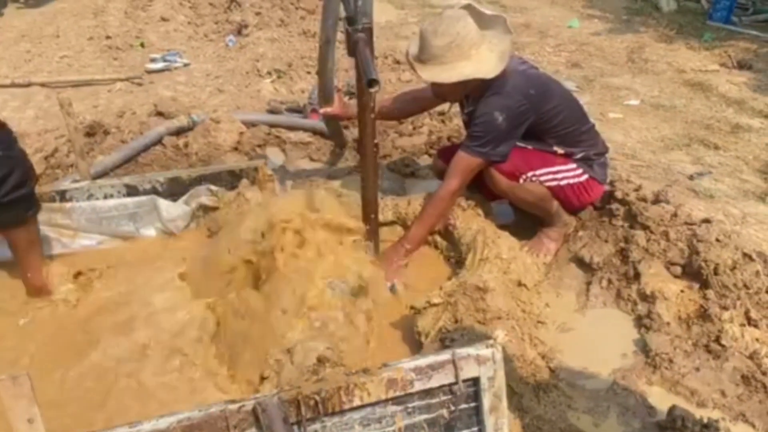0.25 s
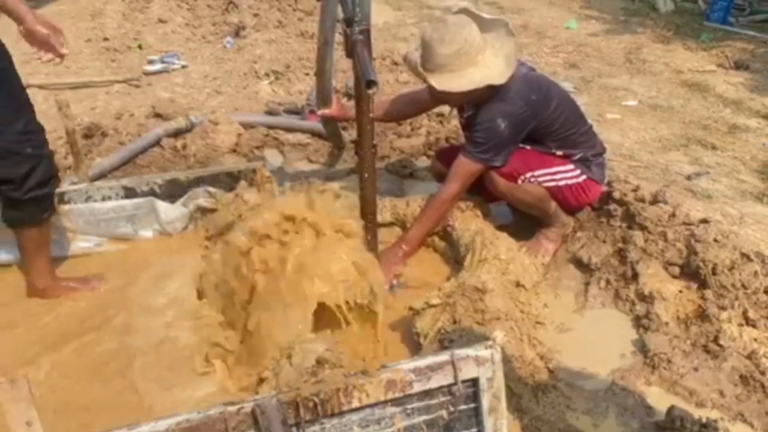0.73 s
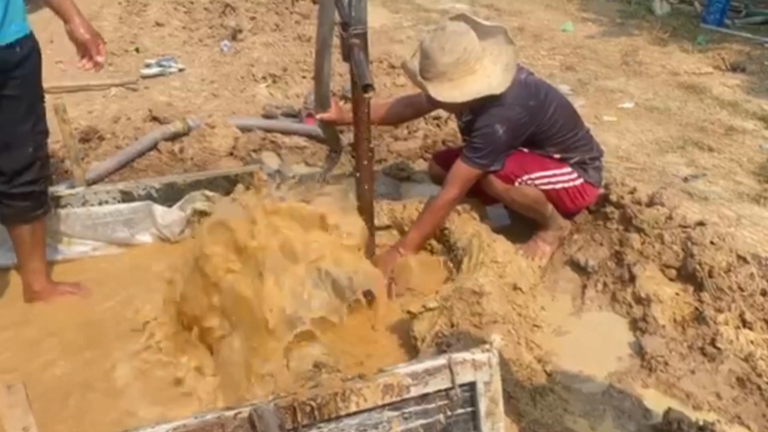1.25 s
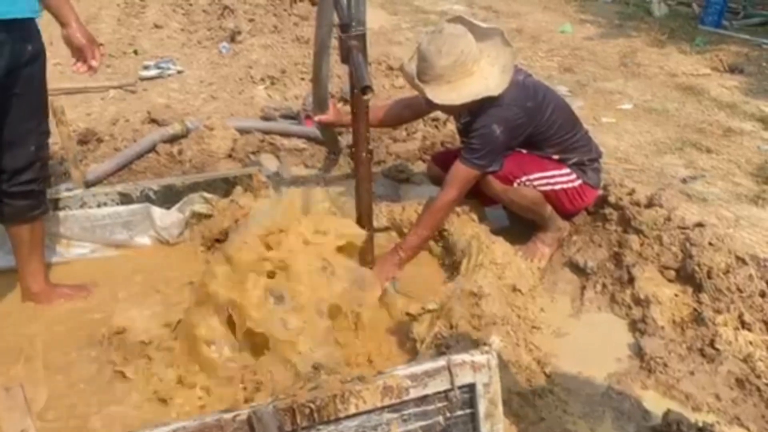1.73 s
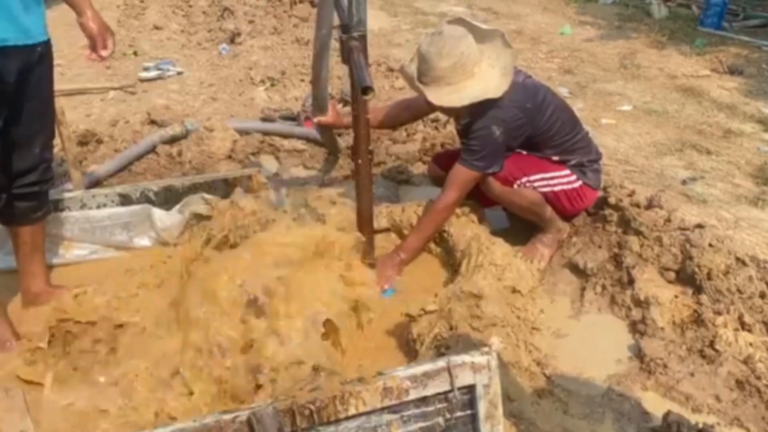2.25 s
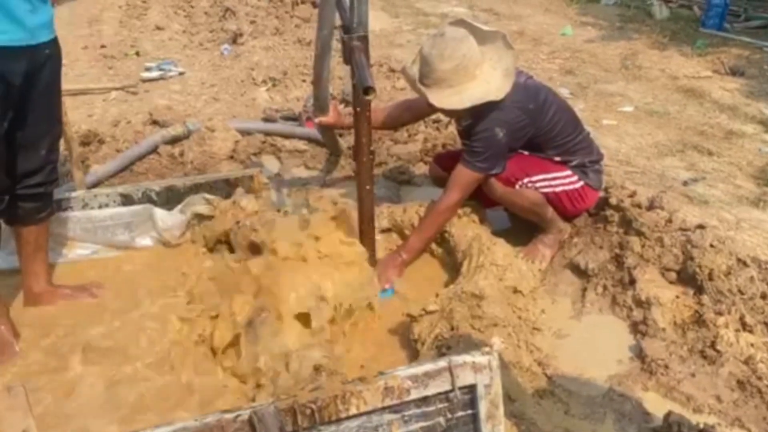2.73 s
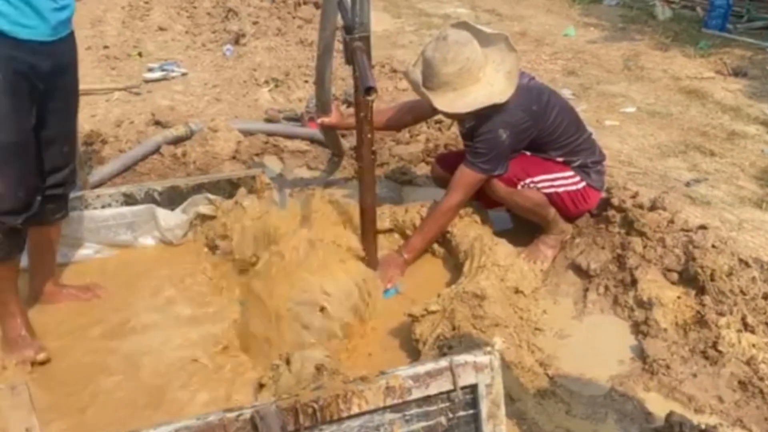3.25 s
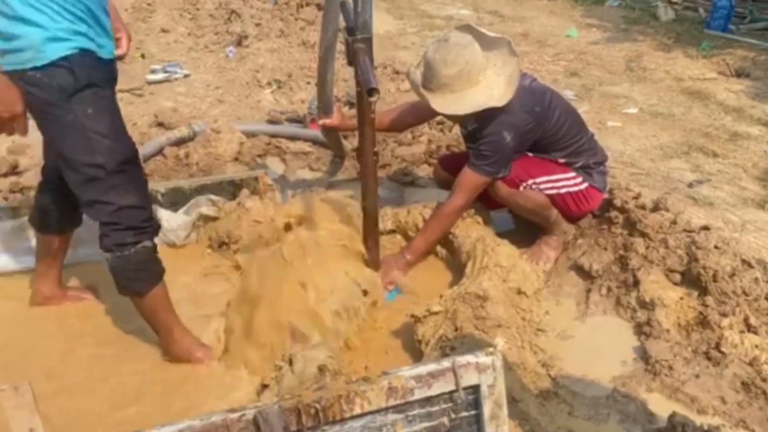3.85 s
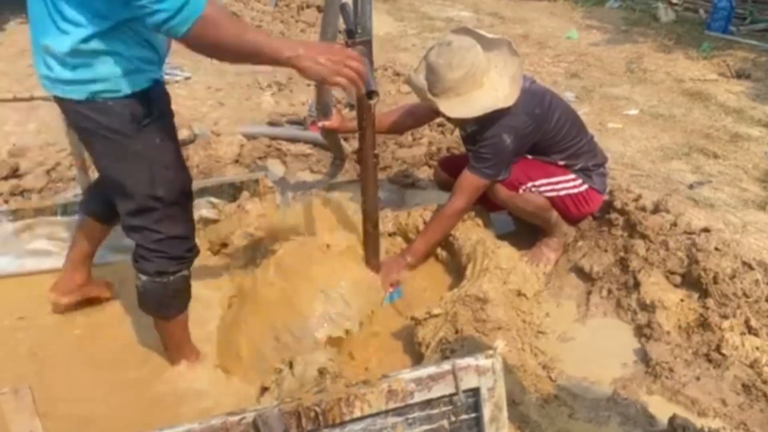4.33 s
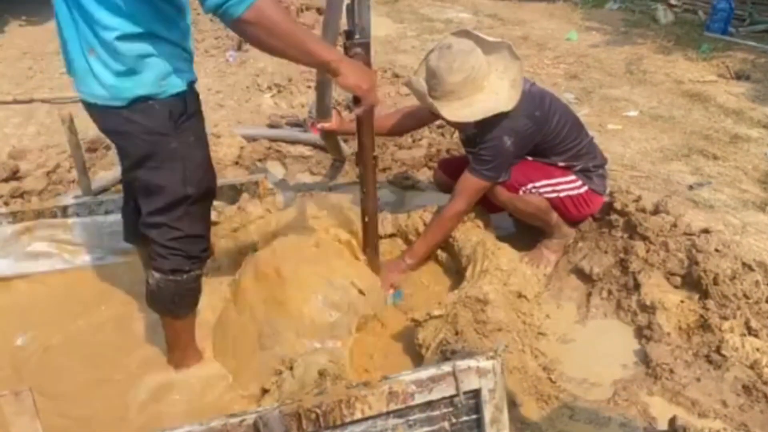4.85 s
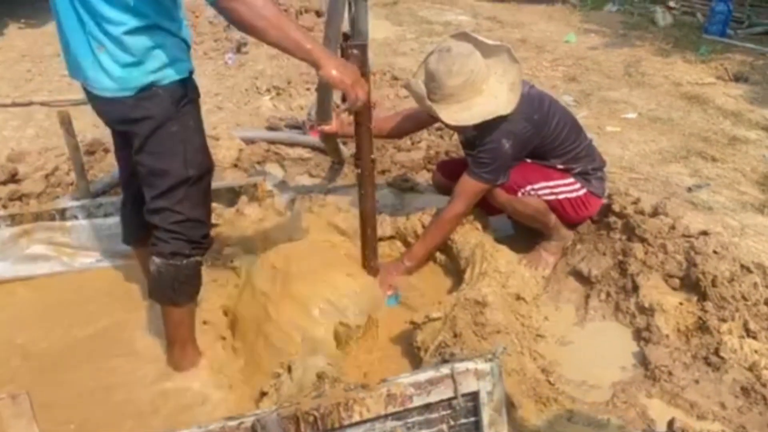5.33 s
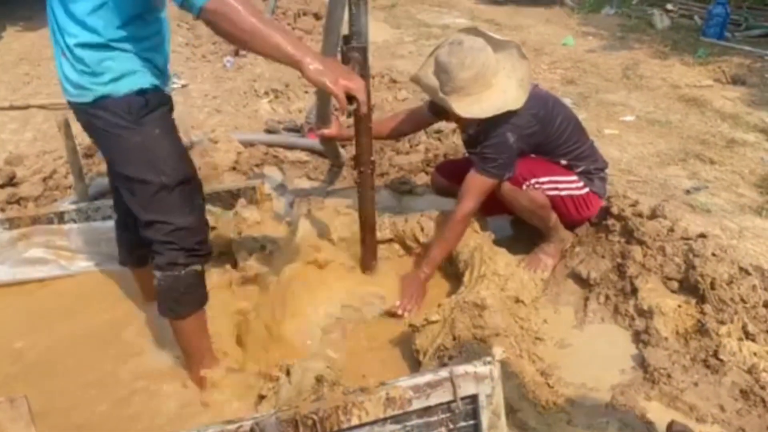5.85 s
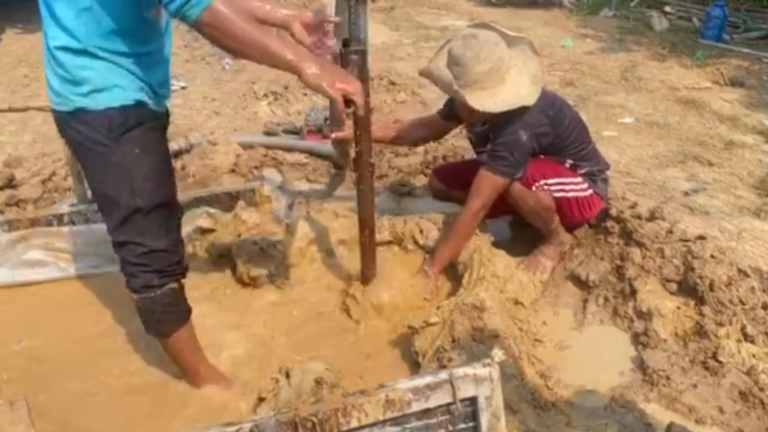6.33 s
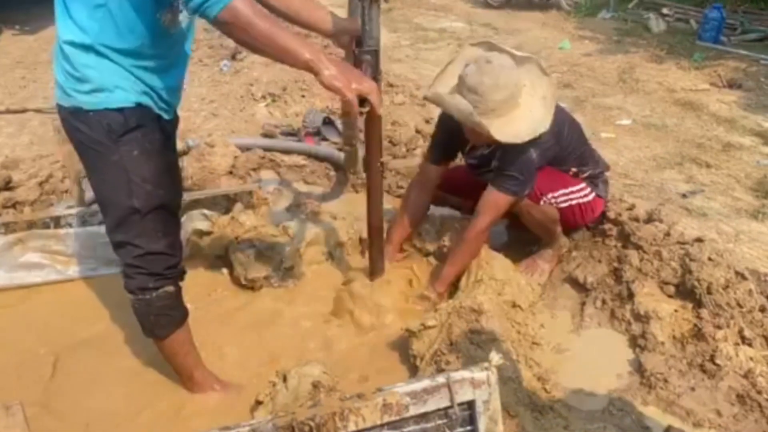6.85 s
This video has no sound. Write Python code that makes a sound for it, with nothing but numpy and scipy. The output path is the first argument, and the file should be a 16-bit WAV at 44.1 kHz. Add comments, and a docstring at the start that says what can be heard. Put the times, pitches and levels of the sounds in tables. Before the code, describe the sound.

Rapid clattering thump of a small diesel pump engine with muddy water rushing; midway its knock fades briefly, then returns slower and lighter.

```python
"""Outdoors, some metres from a phone: a single-cylinder four-stroke diesel drives a mud pump.
Each cycle, gas pulses ring the intake and silencer, and noise bursts ring the block, head, crankcase and valves.
Jolts ring the frame; shaft tones follow the crank; the mud is flickering noise with grains; loose metal clinks.
The throttle is shut after 4.2 s: the engine coasts with little knock for about half a second,
then idles slower, and the mud gushes less."""
import sys
import numpy as np
from scipy import signal
from scipy.fft import rfft, irfft
from scipy.io import wavfile
from scipy.ndimage import uniform_filter1d

SR = 44100
rng = np.random.default_rng(int(sys.argv[2]) if len(sys.argv) > 2 else 0)


def to_wav(s):
    """Save 16-bit WAV."""
    ch = np.atleast_2d(s).T  # columns
    pcm = np.round(np.clip(ch, -1, 1) * 32767)  # PCM
    wavfile.write(sys.argv[1], SR, pcm.astype(np.int16))


N = 312660


def undb(db):
    """Gain of a dB value."""
    return 10 ** (np.asarray(db) / 20)


def unit(x):
    """Scaled to rms 1."""
    return x / np.sqrt(np.mean(x ** 2))


def by_state(state, values):
    """Value interpolated over the engine states 0 pulling, 1 coasting, 2 idling."""
    return np.interp(state, range(3), values)


def ring(x, modes):
    """Sum of two-pole resonances (Hz, width Hz, dB, polarity if given)."""
    out = 0
    for hz, width_hz, db, *sign in modes:
        b, a = signal.iirpeak(hz, hz / width_hz, SR)
        out = out + np.prod(sign) * undb(db) * signal.lfilter(b, a, x)
    return out


def colour(x, points):
    """Spectrum shaped to (Hz, dB) points, straight lines over log frequency."""
    hz, db = np.transpose(points)
    grid_hz = np.maximum(np.arange(N // 2 + 1) * SR / N, 1)
    gain_db = np.interp(np.log(grid_hz), np.log(hz), db)
    return irfft(rfft(x) * undb(gain_db), N)


def walk(rate_hz):
    """Random levels held 1 / rate_hz s, slewed twice, scaled to rms 1."""
    k = int(SR / rate_hz)
    steps = np.repeat(rng.standard_normal(N // k + 1), k)
    slewed = uniform_filter1d(uniform_filter1d(steps, k), k)
    return unit(slewed[:N])


def train(cycle, place, strength, scatter_db, jitter_s):
    """One impulse a cycle at the given place, each a little early or late, weak or strong."""
    at = np.flatnonzero(np.diff(np.floor(cycle - place)) > 0)
    chance = rng.standard_normal((len(at), 2))
    shift = (jitter_s * SR * chance[:, 0]).astype(int)
    moved = np.clip(at + shift, 0, N - 1)
    out = np.zeros(N)
    out[moved] = (strength * np.ones(N))[at] * undb(scatter_db * chance[:, 1])
    return out


def bursts(cycle, table, scatter_db, repeat, jitter_s=0.0003, state=0):
    """Noise with sharp onsets and exponential decays; the share `repeat` of its power is the same every cycle."""
    envelope = 0
    for place, decay_s, *db in table:
        strength = undb(np.interp(state, range(len(db)), db))
        hits = train(cycle, place, strength, scatter_db, jitter_s)
        envelope = envelope + signal.lfilter([1], [1, -np.exp(-1 / (decay_s * SR))], hits)
    turn = np.floor(cycle - table[0][0])
    since = np.arange(N) - np.searchsorted(turn, turn)  # samples since the first row's place
    habit, fresh = rng.standard_normal((2, N))
    return envelope * (np.sqrt(repeat) * habit[since] + np.sqrt(1 - repeat) * fresh)


def pulses(cycle, state, table, scatter_db):
    """A train of short Gaussian pushes for each row; place and strength follow the state."""
    sigma_s = .00015
    push = np.exp(-.5 * (np.arange(-30, 31) / (sigma_s * SR)) ** 2)
    out = []
    for row in table:
        place, strength = by_state(state, row[:3]), by_state(state, row[3:])
        hits = train(cycle, place, strength, scatter_db, jitter_s=.00004)
        out.append(np.convolve(hits, push / push.sum(), "same"))
    return out


def clinks():
    """Loose metal on the rig: short dull rings, two decaying partials each."""
    # Each row: start in seconds, level of each partial in dB, lower partial in Hz.
    clink_rows = [(3.0256, -22, 1550), (3.3627, -19, 1550), (3.75, -22.5, 1570), (3.9756, -25, 1545)]
    decay_s = 0.0098
    out, t = np.zeros(N), np.arange(3000) / SR
    for start_s, db, hz in clink_rows:
        k = int(start_s * SR)
        partials = np.sin(2 * np.pi * hz * t) + np.sin(2 * np.pi * 1.07 * hz * t)
        out[k:k + len(t)] += undb(db) * np.exp(-t / decay_s) * partials
    return out


def mud(state):
    """Slurry gushing and slopping: flickering hiss with dense soft grains; level and middle thin with the pump."""
    # Slurry spectrum. Each row: frequency in Hz, relative density in dB per Hz.
    slurry_spectrum = [(18, -44), (30, -19.5), (71, -17.5), (168, -15.5), (213, -11), (277, -11.5),
                       (554, -19), (703, -22.5), (810, -26), (950, -24), (1140, -32.5), (1440, -30),
                       (1830, -26), (2950, -29), (3750, -29), (6650, -34.5), (9070, -50), (11800, -105.5),
                       (20000, -120)]
    # The mud's hollow middle: centre in Hz, width in Hz.
    gurgle = (555, 200)
    # Share of that middle gone: pulling, coasting, idling (0-1).
    drained = (0, .4, .55)
    # Level in dB: pulling, coasting, idling.
    level_db = (-25, -27.5, -28.5)
    grains_per_s, grains_db, flicker_db = 1500, -6.0, 0.83
    grains = (rng.random(N) < grains_per_s / SR) * rng.standard_normal(N)
    flicker = undb(flicker_db * walk(6.7))
    rough = rng.standard_normal(N) + undb(grains_db) * unit(grains)
    slurry = unit(colour(flicker * rough, slurry_spectrum))
    middle = ring(slurry, [(*gurgle, 0)])
    return undb(by_state(state, level_db)) * (slurry - by_state(state, drained) * middle)


def rotation(cycle, state):
    """Sines tied to the shaft: the unbalanced crank shakes the skid, gear tones waver in level."""
    # Each row: multiple of crank speed, place of the crest in the turn (0-1), dB pulling, coasting, idling.
    skid_shake = [(1, .22, -37, -45, -49), (3, .053, -26, -50, -45), (4, .96, -36, -45, -33)]
    # Pump gear behind the belt, then hums that need load.
    # Each row: times a cycle, dB pulling, coasting, idling.
    gear_tones = [(47.56, -41, -39, -37.5), (37, -41.5, -60, -60), (39, -41.5, -60, -60),
                  (43, -41.5, -60, -60), (51, -44, -60, -60), (56, -45, -60, -60), (74, -38.5, -60, -56)]
    waver_db = 1.6
    out = np.zeros(N)
    for k, place, *db in skid_shake:
        out += undb(by_state(state, db)) * np.cos(2 * np.pi * k * (cycle * 2 - place))
    for k, *db in gear_tones:
        level_db = by_state(state, db) + waver_db * walk(5.4)
        out += undb(level_db) * np.sin(2 * np.pi * k * cycle)
    return out


def frame(cycle, state):
    """Rod and valve gear jolt the steel frame, which hums at its resonances."""
    # Each row: place in the cycle (0-1) pulling, coasting, idling, then relative signed strength for each.
    jolts = [(0.0407, 0.0432, 0.008, 28, -14, 6), (0.0924, 0.0537, 0.1045, 39, -5, 1),
             (0.2594, 0.3181, 0.3137, 5, -7, 11), (0.4519, 0.4302, 0.4596, -27, 8, -26),
             (0.541, 0.5505, 0.5366, 74, -2, 43), (0.7189, 0.7189, 0.6374, -2, 17, 17),
             (0.7827, 0.7903, 0.7942, 26, 28, -2), (0.9269, 0.9917, 0.9586, -19, 8, -3)]
    # Frame resonances. Each row: frequency in Hz, width in Hz, relative level in dB, polarity.
    frame_modes = [(403.9, 44.2, -10.1, 1), (439.3, 16.8, -8.3, -1), (488.6, 19.3, -21.9, 1),
                   (653.8, 12.0, -23.0, 1), (717.4, 33.3, -23.8, -1), (852.1, 31.3, -18, -1),
                   (1321.9, 60, -24, -1), (1483.1, 36.8, -19.8, -1)]
    return ring(sum(pulses(cycle, state, jolts, scatter_db=0.5)), frame_modes)


def crankcase(cycle, state):
    """Rod play raps the crankcase, which hums nearly alike every cycle."""
    # Each row: place in the cycle (0-1), decay in seconds, relative level in dB.
    rod_raps = [(.475, 0.0089, -6.5), (.555, 0.003, 2), (0.6, 0.005, -4), (0.8, 0.0029, -5.5),
                (.065, 0.0033, 4)]
    # Crankcase resonances. Each row: frequency in Hz, width in Hz, relative level in dB.
    case_modes = [(694, 8, -0.5), (713, 8.7, -3.5), (757, 32, 2.5), (906, 24, -10), (983, 30, -1.5),
                  (1024, 7.3, -7)]
    # Level in dB: pulling, coasting, idling.
    level_db = (-35, -38.5, -34)
    raps = bursts(cycle, rod_raps, scatter_db=.6, repeat=.75, jitter_s=.00005)
    return undb(by_state(state, level_db)) * unit(ring(raps, case_modes))


def valves(cycle, state):
    """Valves clack: bright noise bursts, mostly fresh each cycle."""
    # Each row: place in the cycle (0-1), decay in seconds, relative dB pulling, coasting, idling.
    clacks = [(.455, 0.0083, 4, 5.5, 0), (.69, 0.013, 2, -11.5, 1), (.94, 0.0043, -3, 3, 5),
              (0, 0.0046, -16, -9.5, -14)]
    # Bright tick spectrum. Each row: frequency in Hz, relative density in dB per Hz.
    tick_spectrum = [(800, -22.5), (1000, -5.5), (1500, -11), (3000, -7.5), (3700, -24.5), (4600, -0.5),
                     (5200, -5), (6900, -4.5), (9070, -37.5), (11800, -56), (20000, -120)]
    # Level in dB: pulling, coasting, idling.
    level_db = (-34.5, -40.5, -41)
    clack = bursts(cycle, clacks, scatter_db=1.5, repeat=0.15, state=state)
    return undb(by_state(state, level_db)) * unit(colour(clack, tick_spectrum))


def gas(cycle, state):
    """Intake and silencer ring at pulses that repeat almost exactly; flow noise roughens them a little."""
    # Gas pulses of one cycle, intake first, then those in the silencer; push +, suction -.
    # Each row: place in the cycle (0-1) pulling, coasting, idling, then relative strength for each.
    gas_pulses = [(-0.0214, -0.018, -0.0113, 161, 186, 133), (0.214, 0.2179, 0.2242, -36, -47, -56),
                  (0.4318, 0.4177, 0.4224, 36, 24, 17), (0.6355, 0.6228, 0.6484, 100, -13, 50),
                  (0.7715, 0.7474, 0.7611, -53, 9, -57), (0.856, 0.836, 0.8232, 55, 32, 31)]
    # Intake resonances. Each row: frequency in Hz, width in Hz, polarity, relative dB pulling, coasting, idling.
    intake_modes = [(48.6, 16.8, -1, -1.3, -1.3, -1.3), (51.1, 27.8, 1, -2.5, -2.5, -2.5),
                    (132.7, 17.6, 1, -9.6, -9.6, -9.6), (212.8, 65.5, 1, 0.5, 0.7, 0.7),
                    (286.1, 175.6, -1, 2.8, 2.6, 2.1), (300.1, 28.0, 1, -0.4, -0.8, -5.5),
                    (350.0, 79.4, 1, -2, -1.8, -1.2), (468.8, 151.5, 1, -10.5, -11.4, -12),
                    (715.2, 171.4, 1, -2.4, -2.4, -5.5), (724.8, 136.3, -1, -2.4, -2.4, -5.5)]
    # Whistle on the intake pulse while coasting. Each row: frequency in Hz, width in Hz, relative dB, polarity.
    throat_modes = [(716, 32, -16.5, -0.9)]
    # Silencer resonances. Each row: frequency in Hz, width in Hz, relative level in dB, polarity.
    silencer_modes = [(71.0, 75.7, -7.1, -1), (80.3, 22.8, -0.8, 1), (226.9, 79.4, -0.2, 1),
                      (260.3, 77.1, 0.8, -1), (314.3, 41.8, -9.3, 1)]
    # Air filter and silencer packing swallow the treble. Each row: frequency in Hz, gain in dB.
    felt = [(1300, -0.5), (2600, -20.5)]
    # Relative gain of the duct flow noise in dB: pulling, coasting, idling.
    flow_db = (-19.5, -21, -16)
    intake, *exhaust = pulses(cycle, state, gas_pulses, scatter_db=0.8)
    noise = uniform_filter1d(rng.standard_normal((2, N)), size=20)
    intake_flow, exhaust_flow = undb(by_state(state, flow_db)) * noise
    coasting = 1 - np.abs(state - 1)
    thump = ring(coasting * intake, throat_modes)
    for hz, width_hz, sign, *db in intake_modes:
        drive = undb(by_state(state, db)) * (intake + intake_flow)
        thump = thump + ring(drive, [(hz, width_hz, 0, sign)])
    silencer = ring(sum(exhaust) + exhaust_flow, silencer_modes)
    return colour(thump + silencer, felt)


def knock(cycle, state):
    """Combustion bursts ring the block and hiss; later bursts ring the head."""
    # Combustion bursts. Each row: place in the cycle (0-1), decay in seconds, relative level in dB.
    knocks = [(.435, 0.002, 3), (.478, 0.0025, -1), (.545, 0.005, -4), (.592, 0.003, -4), (0.67, 0.012, -9)]
    # Cast iron resonances. Each row: frequency in Hz, width in Hz, relative level in dB.
    block_modes = [(1710, 78, -6), (1964, 64, -4), (2251, 76, 2.5), (2532, 58, 2.5), (2794, 70, 4),
                   (2945, 140, -2.5), (3360, 150, -3)]
    # Head shakes. Each row: place in the cycle (0-1), decay in seconds, relative dB pulling, coasting, idling.
    head_shakes = [(0.53, 0.007, -3.5, -7.5, -1), (0.599, 0.01, -4.5, -10.5, 0),
                   (0.69, 0.021, -7, -14, -6.5), (0.921, 0.0055, -10, 3, 1)]
    # Head resonances. Each row: frequency in Hz, width in Hz, relative level in dB.
    head_modes = [(1425, 45, -1), (1500, 70, -5), (1575, 45, -7), (1315, 35, -2), (1255, 35, -8)]
    # Hiss spectrum. Each row: frequency in Hz, relative density in dB per Hz.
    clatter_spectrum = [(470, -27.5), (800, -25), (1120, -14), (1350, 1), (1660, -6.5), (1790, -7),
                        (2820, -6), (3390, -26), (3640, -23.5), (4150, -24), (4880, -6), (6890, -14.5),
                        (9070, -33.5), (11800, -64), (20000, -120)]
    # Levels of block, head and hiss in dB: pulling, coasting, idling.
    block_db = (-33, -46, -34.5)
    head_db = (-33.5, -37, -38)
    hiss_db = (-36.5, -56, -40.5)
    block = unit(ring(bursts(cycle, knocks, scatter_db=1.5, repeat=0.55), block_modes))
    head = unit(ring(bursts(cycle, head_shakes, scatter_db=2.5, repeat=.45, state=state), head_modes))
    hiss = unit(colour(bursts(cycle, knocks, scatter_db=2.0, repeat=0.37), clatter_spectrum))
    out = undb(by_state(state, block_db)) * block
    out += undb(by_state(state, head_db)) * head
    return out + undb(by_state(state, hiss_db)) * hiss


def scene():
    """Engine, mud and rig summed at one microphone."""
    # Each row: time in seconds, crank speed in rpm.
    speed = [(0.0, 2151.4), (0.88, 2142.2), (1.71, 2146.9), (2.43, 2138.6), (4.13, 2158.8), (4.29, 2144.3),
             (4.73, 1938.7), (4.97, 1870.6), (5.35, 1833.4), (5.79, 1828.3), (6.29, 1815.4), (7.1, 1815.3)]
    # Each row: time in seconds, engine state (0 pulling, 1 coasting, 2 idling).
    state_points = [(4.2, 0), (4.36, 1), (4.72, 1), (5.0, 2)]
    first_cycle, fade_s = -.3859, 0.15
    t = np.arange(N) / SR
    rpm = np.interp(t, *np.transpose(speed))
    cycle = first_cycle + np.cumsum(rpm) / (120 * SR)  # two turns a cycle
    state = np.interp(t, *np.transpose(state_points))
    # Knock, valves, crankcase and mud take fade_s longer to reach coasting.
    coast_s = state_points[1][0] + fade_s
    slow_fall = np.interp(t, [state_points[0][0], coast_s], [0, 1])
    trailing = np.where(t < coast_s, slow_fall, state)
    mix = clinks() + mud(trailing) + rotation(cycle, state)
    mix += undb(3.0) * frame(cycle, state) + crankcase(cycle, trailing)
    mix += valves(cycle, trailing) + undb(1.14) * gas(cycle, state)
    mix += knock(cycle, trailing)
    return mix[None]


def record(dry):
    """The phone colours the presence range and cuts the top with a steep low-pass."""
    # A dip from the microphone port. Each row: frequency in Hz, gain in dB.
    port_dip = [(3300, -0.5), (3480, -8.5), (3650, -7), (3950, -7.5), (4400, -4.5)]
    top_hz = 9150
    heard = colour(dry[0], port_dip)[None]
    low_pass = signal.ellip(12, .2, 80, top_hz, fs=SR, output="sos")
    return signal.sosfilt(low_pass, heard)


dry = scene()
out = record(dry)
to_wav(out)
```